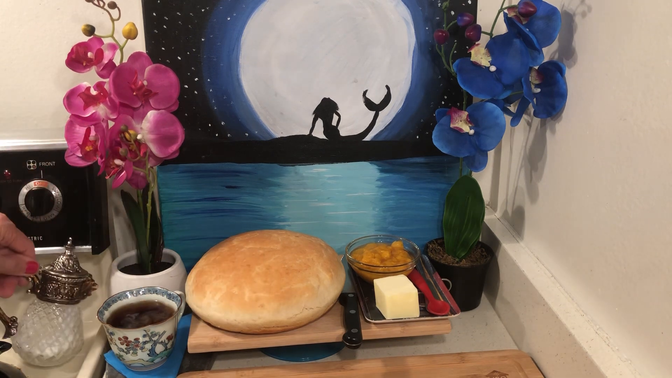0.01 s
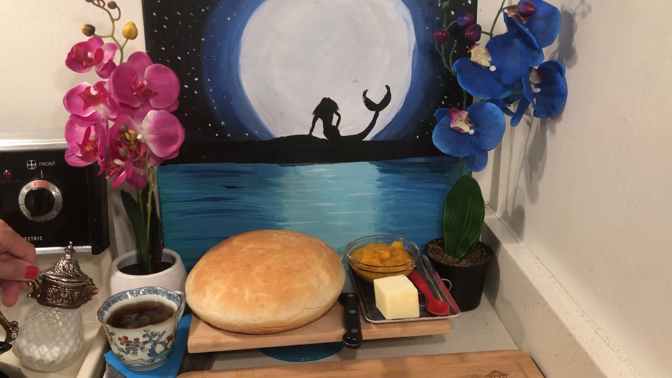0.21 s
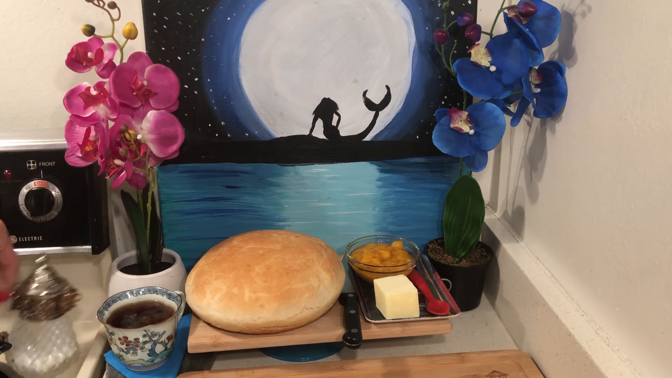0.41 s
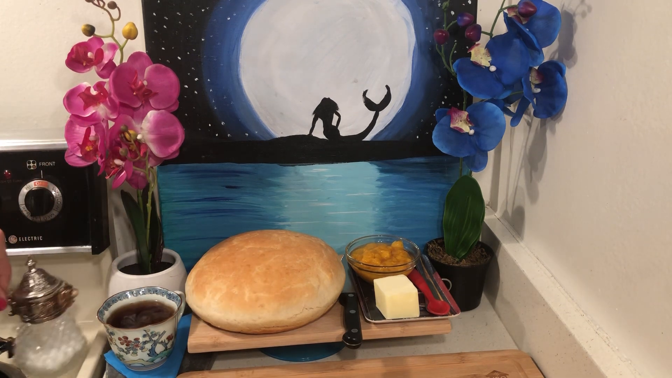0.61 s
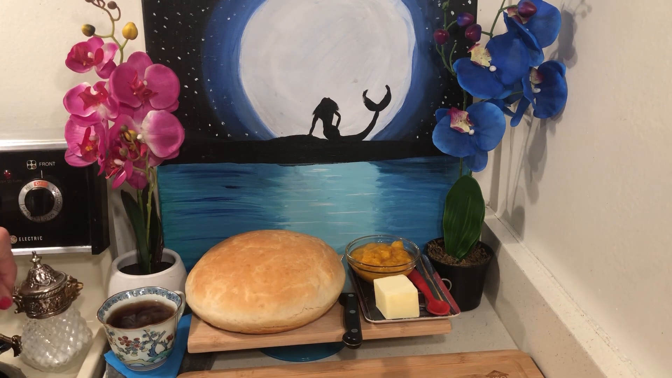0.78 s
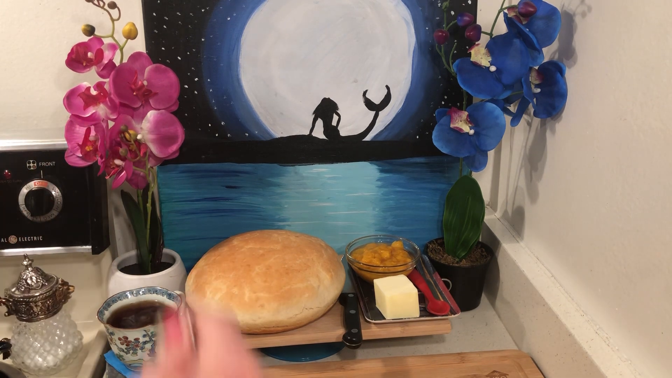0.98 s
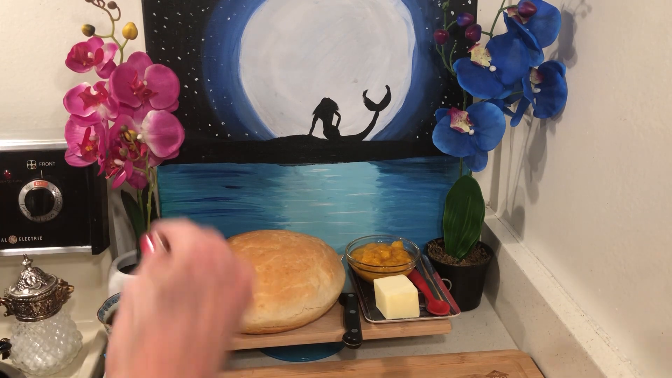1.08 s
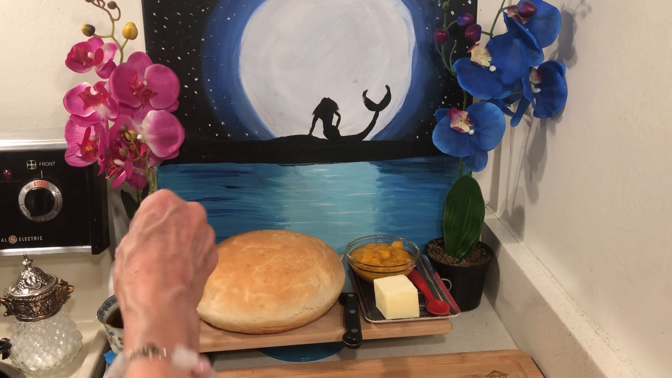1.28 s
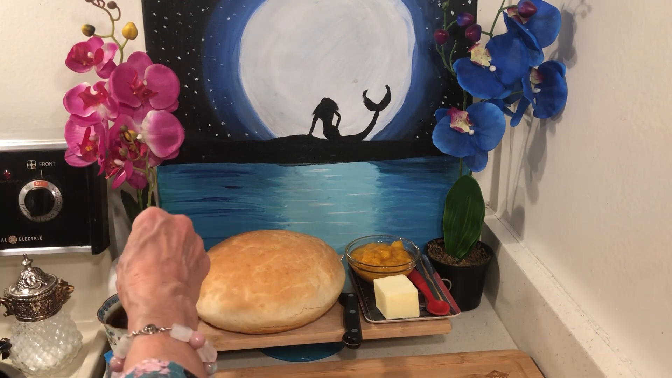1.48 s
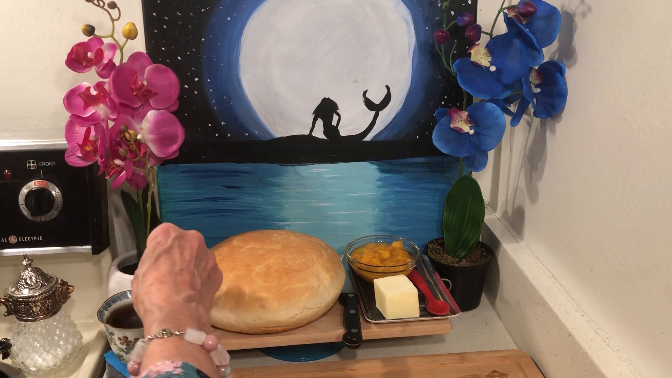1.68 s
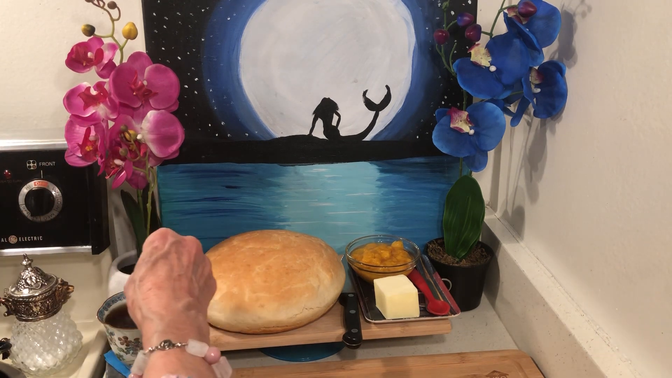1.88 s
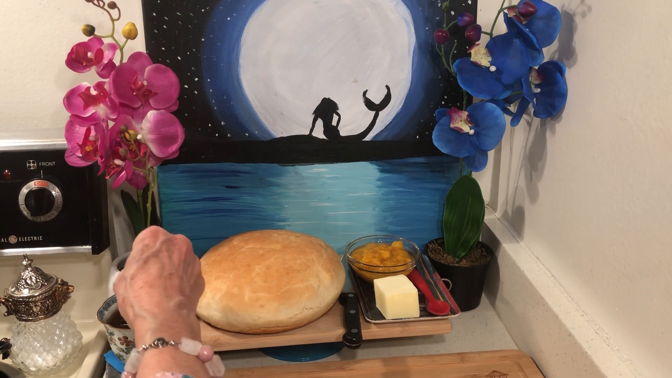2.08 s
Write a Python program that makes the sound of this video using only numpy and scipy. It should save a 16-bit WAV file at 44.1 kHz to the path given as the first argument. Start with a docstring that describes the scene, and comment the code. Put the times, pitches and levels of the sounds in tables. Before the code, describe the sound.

Close up in a small kitchen with low appliance hum: a small metal pot lands with a dull clattering knock, lands again, rattles and slides briefly, then a cup clinks softly with a little scuff and faint bead ticks.

```python
"""Small kitchen: a metal teapot is set down on the counter, knocks, rocks on its foot and slides to rest.
Knocks are noise clatter plus decaying pot modes; the slide is a train of stick-slip clicks.
China and glass clink lightly and a bracelet ticks as the hand moves on: noise ticks plus modes.
The counter thuds low; short echoes, steady air noise and a faint appliance hum form the room."""
import sys
import numpy as np
from scipy import signal
from scipy.fft import rfft, irfft
from scipy.io import wavfile

SR = 44100
rng = np.random.default_rng(int(sys.argv[2]) if len(sys.argv) > 2 else 0)


def generate_wav(sig):
    """Save sig (samples, or channels by samples) to the path in sys.argv[1] as 16-bit PCM at SR."""
    pcm = np.round(np.clip(np.atleast_2d(sig).T, -1, 1) * 32767).astype(np.int16)
    wavfile.write(sys.argv[1], SR, pcm)


N = 92610
BURST_S = 0.7  # length of every ring, burst and echo tail
T = np.arange(int(BURST_S * SR)) / SR


def amp(db):
    """Decibels to gain."""
    return 10 ** (np.asarray(db) / 20)


def unit(x):
    """Scales to an energy of one."""
    return x / np.sqrt(np.sum(x ** 2) + 1e-20)


def blow(x):
    """Scales a short sound to the energy of 40 ms at full level."""
    return unit(x) * np.sqrt(.04 * SR)


def read(points, hz):
    """Reads a table on a log-frequency axis."""
    f, value = np.transpose(points)
    return np.interp(np.log(hz + 1), np.log(f + 1), value)


def add(mix, s, sound):
    """Mixes a sound in at time s."""
    part = mix[max(round(s * SR), 0):][:len(sound)]
    part += sound[:len(part)]


def attack(rise_s):
    """Linear rise to one in rise_s seconds."""
    return np.minimum(T / rise_s, 1)


def fade(t60):
    """Falls by 60 dB in t60 seconds."""
    return np.exp(-np.log(1000) * T / t60)


def colour(x, spectrum, bass_db=0, treble_db=0, size=4096):
    """Causal minimum-phase filter: a spectrum with bass and treble shelves."""
    bass_hz, treble_hz = 330, 3100
    hz = abs(np.fft.fftfreq(size, 1 / SR))
    bass = bass_db / (1 + (hz / bass_hz) ** 2)
    treble = treble_db * hz ** 2 / (hz ** 2 + treble_hz ** 2)
    log_gain = np.log(amp(read(spectrum, hz) + bass + treble))
    taps = np.fft.ifft(np.exp(np.conj(signal.hilbert(log_gain)))).real
    return signal.fftconvolve(x, taps[:size // 2])[:len(x)]


def dying_noise(t60s, rise_s, count=14):
    """White burst whose bands each die at their own speed."""
    hz = np.fft.rfftfreq(len(T), 1 / SR)
    noise = rfft(rng.standard_normal(len(T)))
    centres_hz = np.geomspace(80, 16000, count)
    out = 0
    for centre_hz, own in zip(centres_hz, np.eye(count)):
        band = read(np.c_[centres_hz, own], hz)  # triangular on the log axis
        burst = irfft(noise * band, len(T)) * fade(read(t60s, centre_hz)) * attack(rise_s)
        out = out + np.sqrt(band.sum()) * unit(burst)
    return unit(out)


def ring(modes, scatter_db=0):
    """Sum of exponentially dying sines with random phases; scatter_db varies the mode levels."""
    out = 0
    for hz, db, t60 in modes:
        level = amp(db + scatter_db * rng.standard_normal())
        out = out + level * fade(t60) * np.sin(2 * np.pi * (hz * T + rng.random()))
    return unit(out)


# Echo decay. Each row: frequency in Hz, t60 in s.
ROOM_T60_S = [(100, 0.85), (260, 0.42), (700, 0.36), (1800, 0.28), (5000, 0.33), (13000, 0.16)]


def room(x, wet_db, delay_s=.003, rise_s=0.011):
    """Direct sound plus the short diffuse echo of a small kitchen."""
    tail = np.r_[np.zeros(int(delay_s * SR)), dying_noise(ROOM_T60_S, rise_s)]
    echo = signal.fftconvolve(x, tail)[:N]
    return (x + amp(wet_db) * echo) / np.sqrt(1 + amp(wet_db) ** 2)


# Air noise spectrum. Each row: frequency in Hz, density in dB per Hz (relative).
AIR_SPECTRUM = [(15, -40), (25, -22.5), (102, -1), (180, -11), (229, -3), (344, -13), (416, -7), (591, -14),
                (840, -13.5), (1130, -17), (1700, -20.5), (14800, -44.5), (16000, -44)]
AIR_LEVEL_DB = -53.5
# Appliance hum. Each row: frequency in Hz, RMS level in dB.
HUM_TONES = [(119, -57.5), (151, -63.5), (226.5, -58), (270, -66), (414, -63.5)]


def room_tone(waver=0.2, count=12):
    """Steady shaped air noise and appliance hum whose level and phase waver slightly."""
    t = np.arange(N) / SR
    gain = amp(read(AIR_SPECTRUM, np.fft.rfftfreq(N, 1 / SR)))
    air = unit(irfft(rfft(rng.standard_normal(N)) * gain, N)) * np.sqrt(N)

    def wander():
        return waver * np.interp(t, np.linspace(0, t[-1], count), rng.standard_normal(count))

    hum = 0
    for hz, db in HUM_TONES:
        depth, drift_rad = wander(), wander()
        tone = np.sin(2 * np.pi * (hz * t + rng.random()) + drift_rad)
        hum = hum + amp(db) * np.sqrt(2) * (1 + depth) * tone
    return amp(AIR_LEVEL_DB) * air + hum


# Counter thuds. Each row: start in seconds, level in dB.
COUNTER_THUDS = [(0.216, -42.5), (0.573, -41.5), (0.754, -48), (0.862, -50.5), (1.644, -51.5)]
# Counter modes. Each row: frequency in Hz, level in dB, t60 in s.
COUNTER_MODES = [(70.2, -1, 0.34), (95.6, -4, 0.43), (122, -21, 1), (156.3, -4.5, 0.49)]


def counter(rise_s=0.074):
    """The worktop modes swell into a low boom and die away."""
    out = np.zeros(N)
    for s, db in COUNTER_THUDS:
        add(out, s, amp(db) * blow(ring(COUNTER_MODES) * attack(rise_s) ** 2))
    return out


# Worktop and near-wall reflections of a tick. Each row: delay in s, level in dB.
TICK_REFLECTIONS = [(.0033, -2.5), (.0052, -10), (.0086, -15), (0.0113, -7)]


def clinks(events, modes, contact, tick_db, tick_t60, wet_db, detune=0):
    """Light hard contacts: a noise tick with reflections, and a clear ring; detune varies the size."""
    ticks, rings = np.zeros(N), np.zeros(N)
    for s, db in events:
        noise = rng.standard_normal(len(T)) * fade(tick_t60)
        tick = amp(db + tick_db) * blow(colour(noise, contact))
        for delay_s, echo_db in [(0, 0)] + TICK_REFLECTIONS:
            add(ticks, s + delay_s, amp(echo_db) * tick)
        size = 1 + detune * rng.standard_normal()
        tones = ring([(hz / size, level, t60) for hz, level, t60 in modes])
        add(rings, s, amp(db) * blow(tones * attack(0.0014)))
    return room(ticks, wet_db) + room(rings, wet_db=-11.5)


# Hard contact of china and glass. Each row: frequency in Hz, density in dB per Hz.
HARD_CONTACT = [(100, -35), (1100, -17), (2200, -5), (3100, -4), (4200, -4.5), (5500, 3.5), (7500, -0.5),
                (11500, -1.5), (13200, -12), (15000, -3), (16500, -15)]
# Glass clinks. Each row: start in seconds, level in dB.
GLASS_EVENTS = [(.0835, -61.5)]
# Glass modes. Each row: frequency in Hz, level in dB, t60 in s.
GLASS_MODES = [(4400, -9, 0.2), (5975, 4, 0.062), (6500, -5, .16), (8030, -9, 0.18), (8340, -15, .12),
               (9700, -15, 0.13), (11100, -17, .1), (13100, -29, .1)]


def glass():
    """Faint tick and short high glass modes."""
    return clinks(GLASS_EVENTS, GLASS_MODES, HARD_CONTACT, tick_db=-11, tick_t60=.03, wet_db=-7)


# China clinks. Each row: start in seconds, level in dB.
CHINA_EVENTS = [(.752, -50.5), (1.7186, -44.5), (1.9575, -69)]
# China modes. Each row: frequency in Hz, level in dB, t60 in s.
CHINA_MODES = [(1319, -17, .8), (1419, -11, .55), (2980, -7, .07), (3352, -3, .36), (3413, 1, .26),
               (5211, -13, .32), (6002, -13, .22), (6799, -19, .22), (8118, -21, .24), (8193, -16, .2),
               (9819, -10, .07), (10300, -18, .15), (11600, -14, .07), (14600, -14, .12)]


def china():
    """Light clinks on china modes, the lowest ringing longest."""
    return clinks(CHINA_EVENTS, CHINA_MODES, HARD_CONTACT, tick_db=-7, tick_t60=.03, wet_db=-6)


# Bead contact. Each row: frequency in Hz, density in dB per Hz.
BEAD_CONTACT = [(100, -25), (2000, 0), (5500, -21), (8000, -3), (10000, -3), (14000, 3), (16000, -8)]
# Bracelet ticks. Each row: start in seconds, level in dB.
BRACELET_EVENTS = [(1.834, -82), (1.861, -80), (1.891, -75), (1.9, -79), (1.943, -72), (1.9565, -59.5),
                   (2.013, -85), (2.035, -81), (2.054, -80), (2.066, -85), (2.089, -74.5)]
# Bead modes. Each row: frequency in Hz, level in dB, t60 in s.
BRACELET_MODES = [(8166, -6, .15), (8489, -5, .14), (9862, -3, .1), (10150, -6, .1), (11300, -6, .05),
                  (12350, -7, .11), (13940, -3, .1), (15200, -8, .05)]


def bracelet():
    """Tiny bead ticks, each bead with its own size and so its own pitch."""
    return clinks(BRACELET_EVENTS, BRACELET_MODES, BEAD_CONTACT,
                  tick_db=0, tick_t60=.012, wet_db=-10, detune=.006)


# Pot and counter modes, for rubs and knocks.
# Each row: frequency in Hz, dB struck at one side of the foot, dB struck at the other, t60 in s.
POT_MODES = [(290, -5, -19, .32), (378, -1, -8, .28), (434, -7, -7, .28), (482, -17, -6, .25),
             (581, 2, -7, .21), (612, -13, 0, .2), (695, -2, -6, .23), (950, -7, -14, .25),
             (1045, -12, -7, .23), (1174, -9, -1, .22), (1446, 3, -12, .17), (1700, -11, -1, .17),
             (2015, -2, -18, .19), (2282, -8, -13, .17), (3260, -11, -7, .15), (3537, -19, -17, .3),
             (9825, -16, -32, .12)]


def rub(levels, spectrum, ring_db, slips_per_s=600, slip_spread_db=6.5):
    """Sticking and slipping: uneven small clicks drive the pot and counter."""
    slipping = rng.random(N) < slips_per_s / SR
    sign = rng.choice([-1, 1], N)
    size = amp(slip_spread_db * np.minimum(rng.exponential(1, N), 3))
    level_db = np.interp(np.arange(N) / SR, *np.transpose(levels), left=-120, right=-120)
    slips = unit(slipping * sign * size) * np.sqrt(N) * amp(level_db)
    grain = unit(colour(dying_noise([(100, 0.07), (8000, 0.05)], 0.00054), spectrum))
    tones = ring([(hz, far, t60) for hz, near, far, t60 in POT_MODES])
    body = unit(grain + amp(ring_db) * tones)
    return room(signal.fftconvolve(slips, body)[:N], wet_db=-5.5)


# Scuff level. Each row: time in seconds, level in dB.
SCUFF_LEVELS = [(1.657, -68), (1.663, -51), (1.672, -43), (1.69, -56), (1.71, -73), (1.73, -85)]
# Scuff spectrum. Each row: frequency in Hz, density in dB per Hz.
SCUFF_SPECTRUM = [(60, -26), (300, -3), (700, 5), (1200, -3), (1900, 3.5), (3000, -2), (4800, -15),
                  (7000, -32), (15000, -43)]


def scuff():
    """A brief stick-slip scuff by the cup."""
    return rub(SCUFF_LEVELS, SCUFF_SPECTRUM, ring_db=-16)


# Slide level. Each row: time in seconds, level in dB.
SLIDE_LEVELS = [(.5, -69), (.55, -46.5), (.62, -83), (.71, -39.5), (.8, -64), (.85, -65), (0.889, -41.5),
                (.925, -43.5), (.965, -44), (.995, -48), (1.016, -64), (1.06, -93)]
# Scrape spectrum. Each row: frequency in Hz, density in dB per Hz.
SCRAPE_SPECTRUM = [(60, -17), (200, 1), (450, 7), (1200, -1.5), (2200, -8), (3500, -17), (6000, -24.5),
                   (15000, -40)]


def slide():
    """The foot scrapes over the counter in surges."""
    return rub(SLIDE_LEVELS, SCRAPE_SPECTRUM, ring_db=-12)


# Pot knocks. Each row: start in seconds, level in dB, bass shelf in dB, treble shelf in dB,
# build-up in s, contact place 0-1 across the foot, ring in dB re clatter, contact upper edge in Hz.
POT_KNOCKS = [(.003, -40.5, -9, -23.5, 0.00067, 0.53, -5.5, 11900),
              (.2008, -26.5, 1.5, 7.5, 0.0025, 0, -5.5, 18900),
              (0.2083, -28.5, 7.5, 4.5, 0.0017, 0.27, -5, 14000),
              (0.5626, -37, -3, 9, 0.00043, 0.7, -11, 19000),
              (0.5777, -27.5, -2, -2, 0.0022, 0.72, -7.5, 16000),
              (.669, -42.5, -10, -6.5, 0.00089, 1, 2.5, 14000),
              (0.683, -36, -10, -12, 0.0015, 0.65, -4.5, 12000),
              (0.739, -40.5, 2, -10, 0.0013, 0.8, 1, 13900),
              (.752, -39.5, 6.5, -1.5, 0.00044, 0.5, -11, 9000),
              (0.7568, -31.5, -4, -9, 0.0022, 0.93, -0.5, 13200),
              (0.8629, -45, 3, -16, 0.00085, 1, -2.5, 12100), (.912, -42, -4, -25, 0.0038, 1, -11, 8000),
              (.927, -46, -1, -13, 0.0022, 0.6, -2.5, 8700), (.951, -43.5, 8, -16, 0.00071, 1, -9, 7000),
              (1.661, -50, -8, 4, 0.0013, .1, -6, 2610), (2.095, -55, -5, -8, 0.0024, .5, -16, 13300)]
# Clatter spectrum. Each row: frequency in Hz, density in dB per Hz.
CLATTER_SPECTRUM = [(40, -26), (90, -4), (170, -2), (450, 2), (700, -0.5), (1200, -1), (2400, -5),
                    (3400, -6.5), (4500, -11), (7000, -13.5), (11000, -20.5), (16000, -26)]
# Clatter decay. Each row: frequency in Hz, t60 in s.
CLATTER_T60_S = [(100, 0.16), (500, 0.087), (2000, 0.082), (6000, 0.052), (15000, 0.04)]


def teapot():
    """Each knock is a dense clatter and a ring whose balance depends on where the foot lands."""
    clatter, rings = np.zeros(N), np.zeros(N)
    for s, db, bass_db, treble_db, rise_s, place, ring_db, edge_hz in POT_KNOCKS:
        contact = signal.butter(2, edge_hz, fs=SR)
        burst = colour(dying_noise(CLATTER_T60_S, rise_s), CLATTER_SPECTRUM, bass_db, treble_db)
        add(clatter, s, amp(db) * blow(signal.lfilter(*contact, burst)))
        modes = [(hz, near + place * (far - near), t60) for hz, near, far, t60 in POT_MODES]
        tones = ring(modes) * attack(0.0026)
        add(rings, s, amp(db + ring_db) * blow(signal.lfilter(*contact, tones)))
    return room(clatter, wet_db=-8) + room(rings, wet_db=-15.5)


def scene():
    """The pot, its neighbours and the room, as one channel."""
    pot = teapot() + counter() + slide()
    neighbours = scuff() + china() + glass() + bracelet()
    return (pot + neighbours + room_tone())[None]


def record(dry, edge_hz=16200):
    """Linear-phase low-pass that limits the band."""
    taps = signal.firwin(255, edge_hz, window=("kaiser", 9), fs=SR)
    return signal.oaconvolve(dry, taps[None], "same")


dry = scene()
out = record(dry)
generate_wav(out)
```